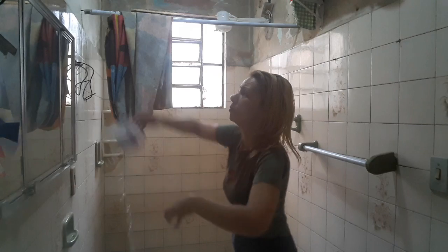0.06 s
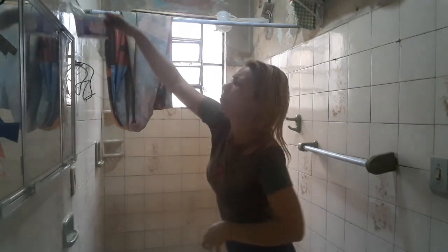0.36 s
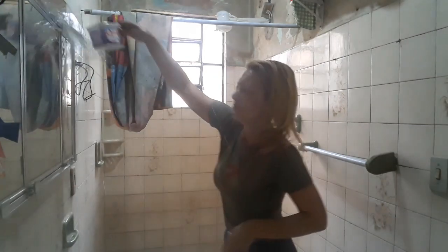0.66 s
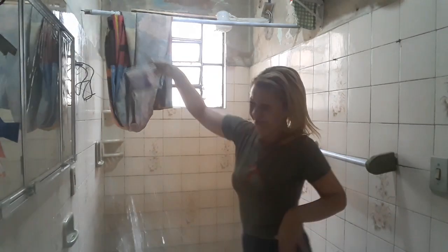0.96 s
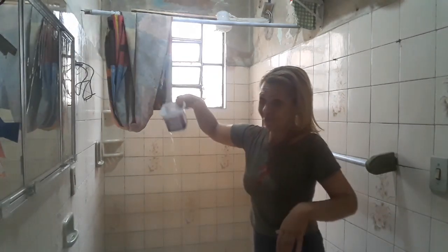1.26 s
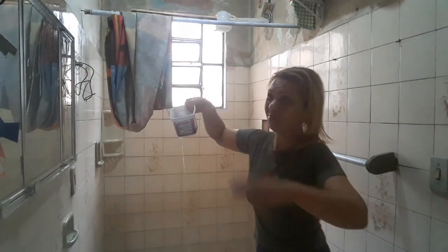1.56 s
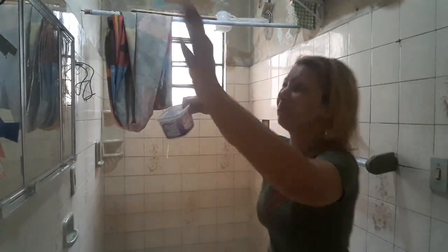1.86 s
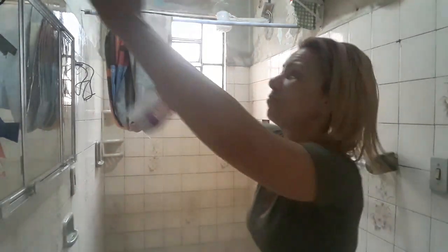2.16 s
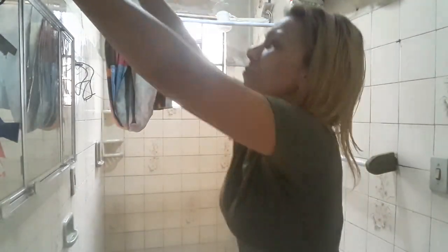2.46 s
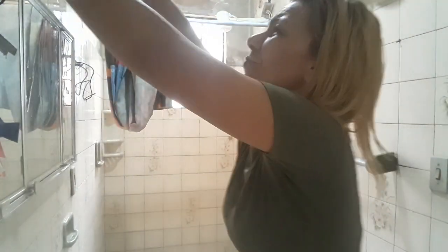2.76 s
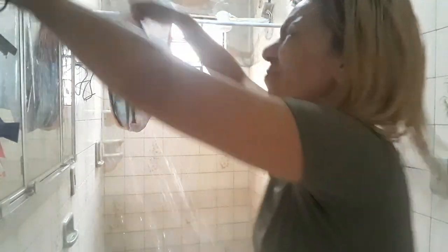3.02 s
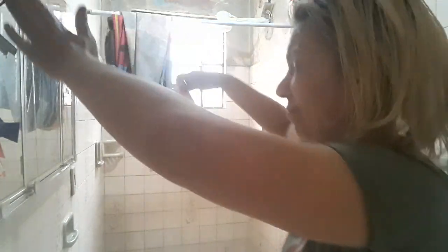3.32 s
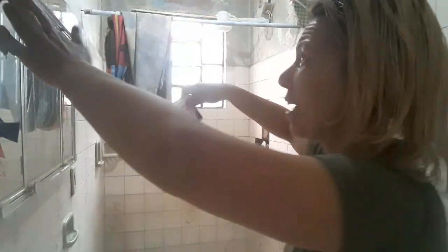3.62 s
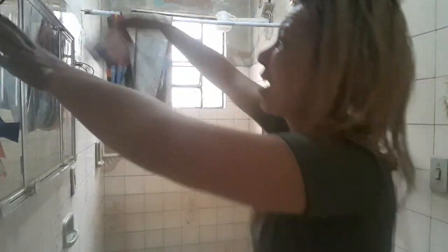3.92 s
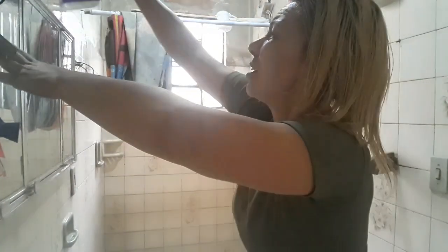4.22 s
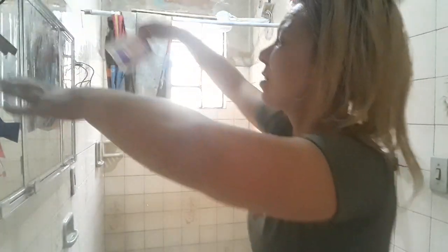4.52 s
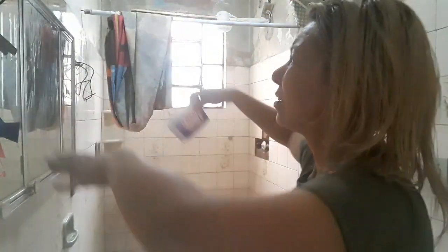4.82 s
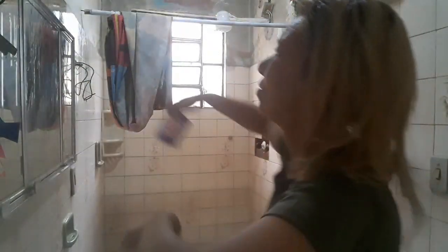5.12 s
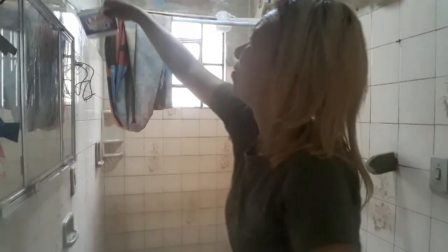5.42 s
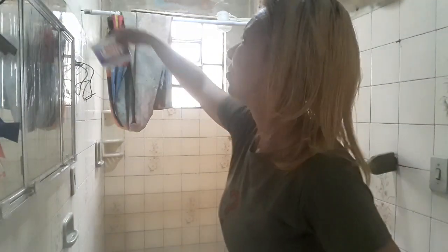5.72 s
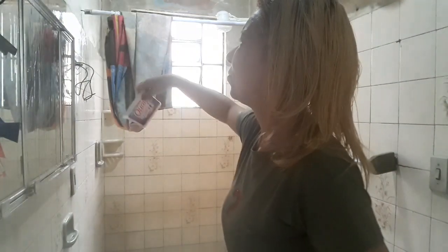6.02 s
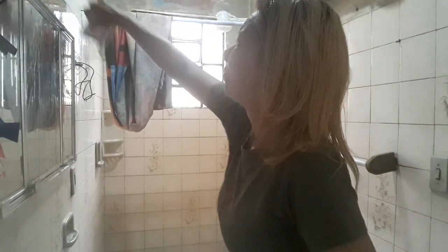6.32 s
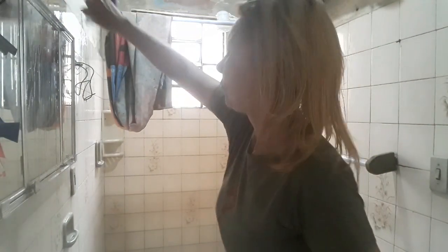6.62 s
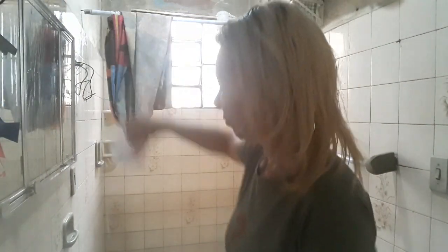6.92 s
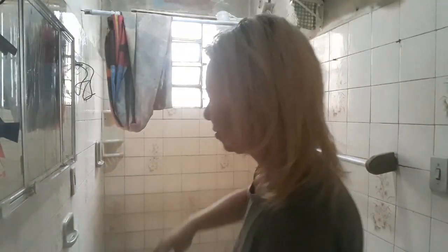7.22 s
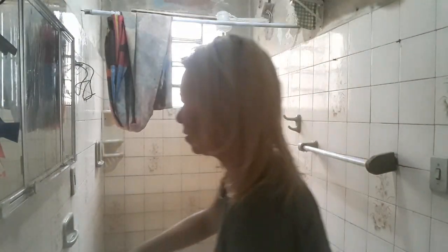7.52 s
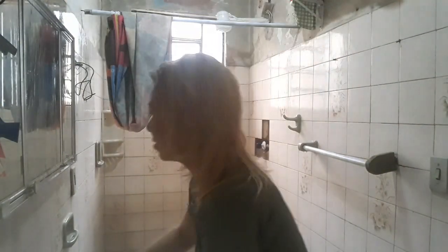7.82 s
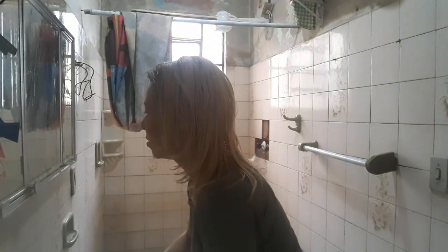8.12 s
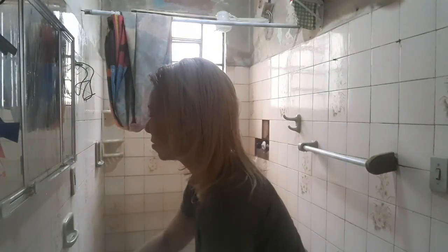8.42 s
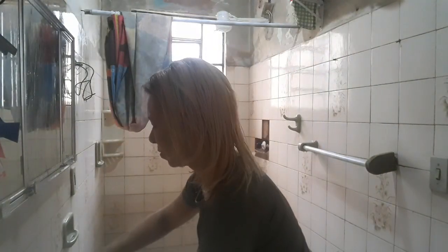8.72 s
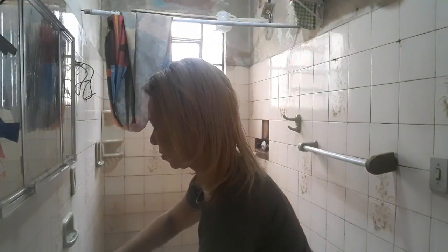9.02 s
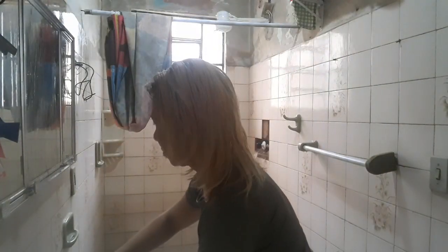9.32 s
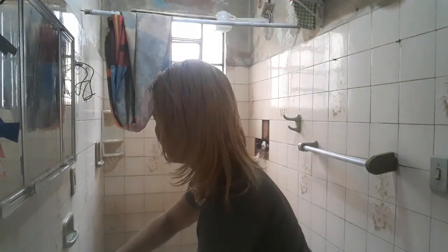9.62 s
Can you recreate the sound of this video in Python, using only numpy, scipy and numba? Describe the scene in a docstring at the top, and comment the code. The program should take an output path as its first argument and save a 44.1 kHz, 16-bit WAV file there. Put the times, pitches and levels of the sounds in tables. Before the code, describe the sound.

In a small, echoing tiled bathroom, thrown water splashes unevenly on walls and floor, each throw trailing spray and drips. After some heavy slaps and several softer ones, a cup gives a sharp clack. It then bumps and sloshes around in a nearby bucket with hollow knocks and plops, sounding closer and drier. Finally a tap opens and a bubbling stream builds in the bucket, over a faint background hush.

```python
"""First, cupfuls of water are flung at the walls of a small tiled bathroom and slap down on the floor.
Each impact sets a pocket of air ringing, thumps the surface and throws spray; drops patter in between.
Near 7 s the cup clacks, then knocks and sloshes in a bucket, and near 9 s a tap starts to run into it,
its jet driving resonant bubbles under the surface. Throughout, the hard tiles reflect the sound
into reverberation and low standing waves, over a faint hush."""
import sys
import numpy as np
from scipy import signal
from scipy.fft import rfft, irfft, next_fast_len
from scipy.io import wavfile
from numba import njit

SR = 44100
rng = np.random.default_rng(int(sys.argv[2]) if len(sys.argv) > 2 else 0)


def bounce(signal):
    """Save signal as a 16-bit WAV file at the path given by the first command-line argument."""
    frames = np.transpose(np.atleast_2d(signal))
    limited = np.clip(frames, -1, 1)
    pcm = np.round(limited * 32767).astype(np.int16)
    wavfile.write(sys.argv[1], SR, pcm)


N = 434826
TIME = np.arange(N) / SR
ECHO_TIME = np.arange(int(.8 * SR)) / SR
LEAD_S = .012  # length of the faint lead-in that softens the onset of each impact

# spectral weighting of soft patter (frequency [Hz], relative level [dB])
PATTER_SPECTRUM = [(120, 0), (180, -2.5), (450, -5), (900, 0), (1700, -2), (3000, -4.5), (5000, -13)]
# spectral weighting of fine spray (frequency [Hz], relative level [dB])
MIST_SPECTRUM = [(2000, -12), (4000, -4), (8000, -11), (15000, -1.5)]


def undb(db):
    """Decibels to amplitude ratio."""
    return 10 ** (np.asarray(db) / 20)


def unit(x):
    """Normalise to rms 1."""
    return x / np.sqrt(np.mean(x ** 2) + 1e-20)


def add(track, s, sound):
    """Superpose a sound on the track at time s."""
    i = max(int(s * SR), 0)
    track[i:i + len(sound)] += sound[:max(N - i, 0)]


def decay(t, t60):
    """Exponential damping: 60 dB in t60 seconds."""
    return np.exp(-np.log(1000) * t / t60)


def on_log_axis(points, hz):
    """Interpolate (frequency, value) points over log frequency."""
    f, value = np.transpose(points)
    return np.interp(np.log(np.maximum(hz, 1)), np.log(f), value)


def colour(x, points):
    """Spectral shaping by a curve that rolls off beyond its ends; rms 1."""
    size = next_fast_len(len(x))
    hz = np.arange(size // 2 + 1) * SR / size + 1
    skirts = np.minimum(hz / points[0][0], 1) ** 2 * np.minimum(points[-1][0] / hz, 1) ** 2
    spectrum = rfft(x, size) * undb(on_log_axis(points, hz)) * skirts
    return unit(irfft(spectrum, size)[:len(x)])


def band(x, hz, octaves, order):
    """Causal band-pass filter around hz."""
    high = min(hz * 2 ** (octaves / 2), .46 * SR)
    low = min(hz / 2 ** (octaves / 2), .9 * high)
    return signal.lfilter(*signal.butter(order, [low, high], "band", fs=SR), x)


def lingering(x, fall_s):
    """Leaky integration: the rms envelope of x, its power relaxing with time constant fall_s."""
    keep = np.exp(-1 / (fall_s * SR))
    return np.sqrt(signal.lfilter([1 - keep], [1, -keep], x ** 2))


def hush():
    """Stationary random noise, strongest in the bass, forms the noise floor."""
    # background spectrum (frequency [Hz], relative level [dB])
    spectrum = [(15, -40), (25, -14), (35, -22), (53, -10.5), (195, -5), (354, -11.5), (1020, -12),
                (1230, -19.5), (6210, -31), (14800, -31.5), (16000, -36)]
    return undb(-53.5) * colour(rng.standard_normal(N), spectrum)


def tiled_room():
    """Diffuse field: noise and its decay in bands of about an octave; the treble is absorbed first."""
    # reverberation (frequency [Hz], 60 dB decay time [s])
    reverb_times = [(150, 0.53), (400, 0.38), (1000, 0.42), (2800, 0.44), (7000, 0.31), (15000, 0.19)]
    size = 2 ** 17
    noise = rfft(rng.standard_normal(size))
    hz = np.arange(size // 2 + 1) * SR / size
    edges = np.geomspace(118, SR / 2, 9)
    return [(irfft(noise * ((hz >= low) & (hz < high))),
             decay(ECHO_TIME, on_log_axis(reverb_times, np.sqrt(low * high))))
            for low, high in zip(edges, edges[1:])]


def heard(x, room, echo_db, gap_s=.0029):
    """Convolution adds wall reflections to the direct sound; each spot has its own impulse response."""
    spot = int(rng.random() * (len(room[0][0]) - len(ECHO_TIME)))
    tail = sum(noise[spot:spot + len(fade)] * fade for noise, fade in room)
    tail *= np.clip(ECHO_TIME / gap_s - 1, 0, 1)
    response = undb(echo_db) * tail / np.linalg.norm(tail)
    response[0] = 1
    return signal.fftconvolve(x, response)[:N]


def standing_waves(x):
    """Modal resonance: the small room booms on at its lowest natural frequencies."""
    # room modes (frequency [Hz], 60 dB decay time [s], relative level [dB])
    modes = [(115, .8, -60), (165, .75, -55), (228, .7, -60), (286, .7, -61), (324, .7, -62),
             (414, .7, -63)]
    response = sum(undb(db) * np.cos(2 * np.pi * hz * ECHO_TIME) * decay(ECHO_TIME, t60)
                   for hz, t60, db in modes)
    return undb(-7) * signal.fftconvolve(x, response)[:N]


@njit
def damped_bubbles(start, hz, cycles, amplitude, glide, length):
    """Damped oscillators whose resonance rises as each bubble nears the surface."""
    out = np.zeros(length)
    for k in range(len(start)):
        life = int(cycles[k] * SR / hz[k]) + 2
        omega = 2 * np.pi * hz[k] / SR
        phasor = amplitude[k] + 0j
        step = np.exp(1j * omega - 6 / life)
        bend = np.exp(1j * omega * glide / life)
        for i in range(start[k], min(start[k] + life, length)):
            phasor *= step
            step *= bend
            out[i] += phasor.imag
    return out


def bubbles(per_s, low_hz, high_hz, cycles, scatter_db, glide):
    """A random point process of resonating bubbles or droplets of unequal size."""
    when, pitch, life, strength = rng.random((int(per_s * N / SR), 4)).T
    start = (when * N).astype(np.int64)
    hz = low_hz * (high_hz / low_hz) ** pitch
    amplitude = undb(scatter_db * np.minimum(-np.log(1 - strength), 4)) * np.sqrt(hz)
    return damped_bubbles(start, hz, cycles * (.5 + life), amplitude, float(glide), N)


def stray_drips():
    """Sparse impulses: small drops land with heavily damped ticks."""
    ticks = bubbles(per_s=9, low_hz=5000, high_hz=15000, cycles=3, scatter_db=3.5, glide=.1)
    return undb(-70) * unit(ticks)


def runoff():
    """Incoherent sources add in power: showers of drops from the wet walls swell over a trickle."""
    # showers (peak time [s], 20 dB rise [s], 20 dB fall [s], patter level [dB], spray level [dB])
    showers = [(.43, 0.22, 1.27, -49.5, -46.5), (.74, 0.43, 0.45, -42, -46), (1.18, 0.38, 0.26, -36, -31),
               (1.8, .5, 0.3, -51.5, -54), (2.38, 0.18, 0.4, -46.5, -48.5), (3.23, 0.09, 0.1237, -26, -46),
               (3.38, 0.1, 0.1168, -34, -24), (3.68, 1.3, .2, -54.5, -58), (4.38, 0.3, 0.8, -52.5, -57.5),
               (4.92, .45, 0.19, -48.5, -49.5), (5.45, .5, 0.36, -53, -62), (6.08, 1, 0.3, -58.5, -65.5),
               (6.8, 0.28, 0.4, -55.5, -64), (7.22, 0.15, -0.2, -54, -58)]  # the last has a negative fall, so it holds to the end
    patter_power, mist_power = undb(-69) ** 2, undb(-76) ** 2  # the steady trickle
    for s, rise_s, fall_s, patter_db, spray_db in showers:
        from_peak = np.clip(np.maximum((s - TIME) / rise_s, (TIME - s) / fall_s), 0, 10)
        power = undb(-20 * from_peak ** 1.42) ** 2  # a rounded top with ever steeper sides
        patter_power += power * undb(patter_db) ** 2
        mist_power += power * undb(spray_db) ** 2
    drops = bubbles(per_s=420, low_hz=157, high_hz=3880, cycles=11, scatter_db=2, glide=.35)
    ticks = bubbles(per_s=1600, low_hz=3030, high_hz=15000, cycles=3.2, scatter_db=5.5, glide=.1)
    patter = np.sqrt(patter_power) * colour(drops, PATTER_SPECTRUM)
    return patter + np.sqrt(mist_power) * colour(ticks, MIST_SPECTRUM)


def rebound(water):
    """Secondary impacts: each splash throws off droplets that ping down just after it."""
    airborne = lingering(band(water, 3300, octaves=5.9, order=1), fall_s=.013)
    pings = bubbles(per_s=220, low_hz=996, high_hz=8800, cycles=16, scatter_db=5.5, glide=.18)
    return undb(-19.5) * airborne * unit(pings)


def rings(table, room, echo_db, swell_cycles):
    """Free vibration: each resonator swells briefly, then decays at its natural frequency."""
    out, t = np.zeros(N), np.arange(SR // 2) / SR
    for s, hz, t60, db in table:
        swell = 1 - np.exp(-(hz * t / swell_cycles) ** 2)
        tone = undb(db) * swell * decay(t, t60) * np.sin(2 * np.pi * hz * t)
        add(out, s, heard(tone, room, echo_db))
    return out


def clinks(room):
    """Lightly struck, the cup, the rail and the tap handle ring in their natural modes."""
    # struck modes (time [s], frequency [Hz], 60 dB decay time [s], level [dB])
    modes = [(.244, 2820, 0.044, -25), (.244, 4950, .03, -21), (4.309, 4460, 0.024, -23),
             (5.866, 2956, 0.28, -37.5), (6.998, 2970, 0.04, -25), (6.998, 4780, .006, -8.5),
             (8.514, 2495, 0.19, -34.5), (8.513, 4790, 0.035, -32), (8.602, 2554, 0.13, -39)]
    return rings(modes, room, echo_db=-6, swell_cycles=.83)


def plops(room, decay_cycles=28):
    """Bubble resonance at constant Q: larger, lower air pockets ring longer."""
    # single air pockets (time [s], frequency [Hz], level [dB])
    pockets = [(1.520, 4130, -8), (2.662, 1690, -12.5), (4.310, 2170, -17), (5.762, 1930, -13),
               (6.589, 1120, -24), (7.6695, 860, -4.5), (7.8625, 880, -25), (8.030, 1057, -10.5),
               (8.031, 474, -16.5), (8.602, 1030, -23), (8.678, 713, -18), (8.773, 677, -21.5),
               (9.045, 990, -20.5), (9.3465, 990, -8), (9.467, 963, -19), (9.664, 737, -20),
               (9.788, 1000, -17), (9.835, 1030, -14)]
    tones = [(s, hz, decay_cycles / hz, db) for s, hz, db in pockets]
    return rings(tones, room, echo_db=-5.5, swell_cycles=1.73)


def gulps(room):
    """Mass-spring resonance: big air pockets pulsate under a mass of water."""
    # big air pockets (time [s], frequency [Hz], 60 dB decay time [s], level [dB])
    pockets = [(.876, 168.4, 0.39, -21), (.912, 171.5, 0.26, -24.5), (1.134, 289, 0.13, -16),
               (1.190, 119.1, 0.66, -29.5), (3.194, 250, .12, -20), (3.237, 220, 0.13, -5.5),
               (3.24, 119.6, 0.57, -20.5), (3.255, 165.3, 0.21, -3.5), (3.256, 318, 0.13, -12.5)]
    return rings(pockets, room, echo_db=-16, swell_cycles=.64)


def impact(spread_s, ring_hz, ring_db, thump_db, spray_hz, spray_db,
           ring_octaves, thump_hz, grit_db, snap_s, order):
    """Impulsive excitation: many tiny blows ring a cavity of air, thump the surface and throw spray."""
    t = np.arange(int((LEAD_S + .03 + 6 * spread_s) * SR)) / SR - LEAD_S
    landed = np.maximum(t, 0)
    contact = (1 - np.exp(-landed / (.6 * spread_s))) * np.exp(-landed / spread_s)
    contact += undb(-24) * np.exp(-np.abs(t) / .0065)  # a faint lead-in softens the onset
    grit = undb(grit_db * rng.standard_normal(len(t))).repeat(25)[:len(t)]
    blows = contact * grit * rng.standard_normal((3, len(t)))
    # a compact impact is mostly one clean snap
    snap_at = int((LEAD_S + .4 * spread_s) * SR)
    blows[:, snap_at] += np.linalg.norm(blows[0]) * snap_s / spread_s
    ring = undb(ring_db) * unit(band(blows[0], ring_hz, ring_octaves, order))
    thump = undb(thump_db) * unit(band(blows[1], thump_hz, octaves=2.62, order=3))
    spray = undb(spray_db) * unit(band(blows[2], spray_hz, octaves=1.88, order=1))
    # each level is that of the burst's energy packed into 13 ms
    return (ring + thump + spray) * np.sqrt(.013 * SR / len(t))


def impacts(table, room, echo_db, **timbre):
    """Superposition of impacts, each with the reflections of its own spot."""
    out = np.zeros(N)
    for s, *row in table:
        add(out, s - LEAD_S, heard(impact(*row, **timbre), room, echo_db))
    return out


def heavy_drops(room, spread_s=.0014):
    """Brief contact gives a broad spectrum: a drop ticks on tile with a trace of thump and spray."""
    # single drops (time [s], frequency [Hz], level [dB])
    drops = [(.013, 1490, -42.5), (.335, 3750, -38), (.431, 4560, -36.5), (1.519, 4140, -30),
             (1.66, 12000, -38.5), (1.741, 1710, -43.5), (2.452, 8950, -46), (2.49, 13000, -42.5),
             (2.789, 4400, -47), (2.814, 3300, -42.5), (3.012, 3000, -48), (4.021, 1580, -53),
             (4.206, 7550, -52), (4.452, 11300, -47), (4.553, 6540, -55.5), (4.599, 5960, -54),
             (4.720, 9200, -37.5), (5.523, 9000, -55), (5.645, 12000, -44), (5.687, 5170, -48.5),
             (5.863, 14100, -35), (6.033, 15000, -44.5), (6.294, 8600, -56), (6.589, 1100, -44),
             (8.420, 12070, -46.5)]
    ticks = [(s, spread_s, hz, db, db - 19, hz * 1.6, db - 6) for s, hz, db in drops]
    return impacts(ticks, room, echo_db=-.7,
                   ring_octaves=.84, thump_hz=280, grit_db=3.5, snap_s=.0014, order=2)


def tap(open_s=8.92, opening_s=.13, full_s=9.86):
    """Air entrainment: the jet makes bubbles, plinks and fizz; the fizz outgrows the bubbling."""
    # spectral weighting of large bubbles (frequency [Hz], relative level [dB])
    bubbling_spectrum = [(120, -6.5), (250, -20), (500, -12.5), (750, -3), (1000, 2.5), (1300, -9),
                         (2000, -5.5), (3000, -41)]
    # spectral weighting of surface fizz (frequency [Hz], relative level [dB])
    fizz_spectrum = [(1000, 0), (1700, -9), (2700, -2), (3500, -4.5), (5000, -3), (7500, -3.5), (11000, -7),
                     (15500, -3)]
    opened = np.clip((TIME - open_s) / opening_s, 0, 1)
    until_full_s = np.maximum(full_s - TIME, 0)
    big = bubbles(per_s=420, low_hz=243, high_hz=2180, cycles=13.5, scatter_db=4.5, glide=.058)
    plinks = bubbles(per_s=83, low_hz=2390, high_hz=3410, cycles=78, scatter_db=5, glide=.08)
    small = bubbles(per_s=3200, low_hz=1220, high_hz=15000, cycles=17, scatter_db=4.5, glide=.14)
    bubbling = undb(-35.5 - 12 * until_full_s) * colour(big, bubbling_spectrum)
    fizz = undb(-34 - 18 * until_full_s) * (colour(small, fizz_spectrum) + undb(-8) * unit(plinks))
    return opened * (bubbling + fizz)


def bucket(room, knock_spread_s=.002, gurgle_hz=834, splash_hz=2800):
    """Knocks and sloshes of the cup excite hollow resonances; the stirred water bubbles as it settles."""
    # cup against bucket (time [s], frequency [Hz], ring level [dB], thump level [dB])
    knocks = [(7.342, 930, -42, -45), (7.555, 820, -28, -31.5), (7.670, 836, -29.5, -30),
              (7.828, 230, -40.5, -40), (7.863, 825, -33.5, -62), (7.886, 885, -34.5, -40.5),
              (8.031, 773, -29, -33), (8.466, 1320, -46.5, -44), (8.512, 2437, -42, -40),
              (8.602, 2140, -34.5, -37.5), (8.678, 754, -31, -37.5), (8.736, 197, -39.5, -52),
              (8.773, 660, -47, -46)]
    # cup through water (time [s], spread [s], gurgle level [dB], splash level [dB])
    sloshes = [(7.366, .062, -38, -32), (7.595, 0.027, -26.5, -34), (7.675, 0.015, -43, -33.5),
               (7.945, .032, -34, -38.5), (8.190, .018, -43.5, -56), (8.514, 0.029, -52, -40.5)]
    blows = [(s, knock_spread_s, hz, db, thump_db, splash_hz, db - 14.5)
             for s, hz, db, thump_db in knocks]
    blows += [(s, spread_s, gurgle_hz, db, db - 1.5, splash_hz, splash_db)
              for s, spread_s, db, splash_db in sloshes]
    cup = impacts(blows, room, echo_db=-2.5,
                  ring_octaves=.87, thump_hz=316, grit_db=2.5, snap_s=.0013, order=3)
    stirred = bubbles(per_s=400, low_hz=158.6, high_hz=3740, cycles=12.5, scatter_db=4, glide=.28)
    drops = bubbles(per_s=1000, low_hz=3020, high_hz=15100, cycles=2.5, scatter_db=2.5, glide=.1)
    wake = undb(-12.5) * lingering(cup, fall_s=.028) * colour(stirred, PATTER_SPECTRUM)
    spatter = undb(-21) * lingering(cup, fall_s=.16) * colour(drops, MIST_SPECTRUM)
    return cup + heard(wake + spatter, room, echo_db=-4.5)


def splashes_and_clack(room):
    """Impact: flung water traps air and breaks into spray on the tiles; the cup clacks once near 7 s."""
    # water landing, and one sharp clack of the cup at 6.998 s (time [s], spread [s],
    # ring frequency [Hz], ring level [dB], thump level [dB], spray centre [Hz], spray level [dB])
    hits = [ (.040, .013, 2800, -40, -53.5, 9000, -37.5), (.243, 0.0023, 3680, -33, -33.5, 9900, -30),
            (.378, .0045, 1660, -41.5, -45, 7850, -29), (.482, .012, 1090, -36.5, -60, 3970, -39),
            (.5575, 0.0028, 8500, -23, -36.5, 3540, -20.5), (.566, .006, 925, -33, -36.5, 6000, -40),
            (.672, .016, 1320, -33, -38.5, 2970, -31.5), (.816, .0025, 7160, -42, -39, 12000, -24.5),
            (.868, .023, 795, -37, -26.5, 7000, -49), (1.006, .0036, 2080, -18.5, -34, 8200, -18.5),
            (1.036, 0.017, 1800, -43, -34.5, 14000, -14), (1.123, 0.0089, 4400, -18, -20, 2920, -26.5),
            (1.200, 0.00061, 1440, -15.5, -39, 4800, -33), (1.204, 0.024, 1470, -11, -54, 4040, -16),
            (1.433, 0.012, 1670, -42, -60, 11200, -29), (1.894, 0.0067, 1250, -47, -38, 3680, -43.5),
            (2.141, 0.0024, 1200, -38, -37, 6000, -44), (2.158, 0.037, 1870, -31, -41, 4560, -30),
            (2.572, 0.0099, 1020, -39, -52.5, 2630, -43.5), (2.662, .002, 1600, -25.5, -46.5, 3380, -36),
            (3.135, .02, 594, -53, -38, 3800, -41), (3.177, .0033, 1000, -35, -27, 3770, -37),
            (3.194, .0067, 900, -31.5, -19, 3900, -27), (3.238, .0035, 420, -31, -18, 2900, -31),
            (3.254, .0054, 480, -32, -18.5, 8900, -19.5), (3.273, 0.0065, 3100, -21.5, -41, 9000, -33),
            (3.310, 0.048, 5000, -26.5, -37.5, 10000, -20.5), (3.378, .0021, 1900, -12.5, -42, 7000, -30.5),
            (3.386, .012, 1960, -13, -41, 6500, -21), (3.425, .0077, 2300, -38, -40.5, 11000, -18.5),
            (3.740, .011, 1380, -31.5, -38, 6400, -27.5), (3.832, 0.0027, 1380, -41, -38.5, 11000, -42),
            (4.308, .0038, 2090, -31.5, -46.5, 10000, -37), (4.818, .018, 3930, -33, -33, 10000, -33),
            (4.851, .0029, 3400, -37, -36.5, 9800, -22), (5.029, 0.022, 8750, -25, -45.5, 6950, -32.5),
            (5.756, .0055, 1570, -31, -43.5, 2600, -49), (5.844, 0.0052, 4800, -36.5, -40.5, 11000, -32.5),
            (6.030, .012, 340, -52.5, -49, 14000, -53), (6.536, .013, 1410, -55, -55, 6000, -53),
            (6.799, .003, 1000, -42.5, -39.5, 5000, -47), (6.808, 0.03, 1650, -38.5, -41, 3800, -31.5),
            (6.964, .0022, 15100, -31, -42, 5000, -35.5), (6.998, .0008, 3260, -26, -40, 14000, -30.5),
            (7.216, .009, 1830, -40, -51, 4200, -46)]
    return impacts(hits, room, echo_db=.5,
                   ring_octaves=.98, thump_hz=238, grit_db=5, snap_s=.0015, order=2)


def scene():
    """Splashes, bucket and tap superpose in the reverberant room and drive its modes."""
    room = tiled_room()
    hits = splashes_and_clack(room) + heavy_drops(room)
    falling = runoff() + rebound(hits) + stray_drips()
    far = hits + heard(falling, room, echo_db=-.25) + clinks(room) + plops(room)
    # the bucket stands close by, so it sounds drier and stirs the room's modes less
    near = bucket(room) + heard(tap(), room, echo_db=-1.5)
    gulping = gulps(room)
    boom = standing_waves(far + undb(-3) * near + undb(-15.5) * gulping)
    return (far + near + gulping + boom + hush())[None]


def record(dry):
    """Saturation and band limiting: peaks clip at full scale and the treble ends at 16 kHz."""
    low_pass = signal.ellip(12, .2, 70, 16000, fs=SR, output="sos")
    return signal.sosfilt(low_pass, np.clip(dry, -1, 1))


dry = scene()
out = record(dry)
bounce(out)
```